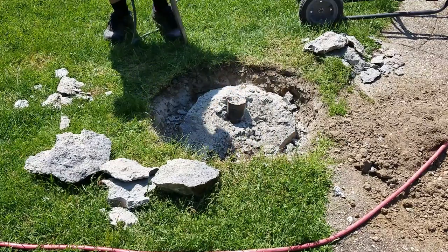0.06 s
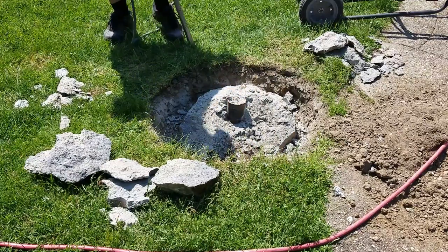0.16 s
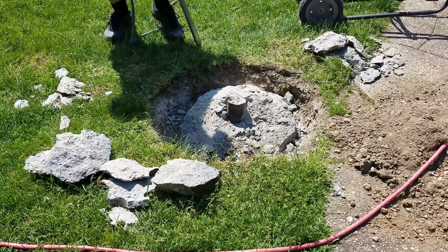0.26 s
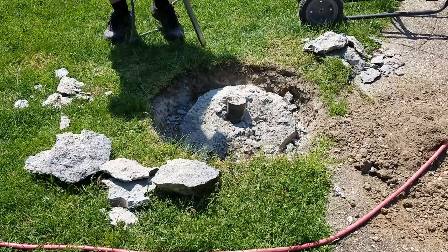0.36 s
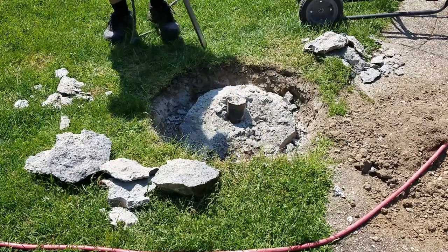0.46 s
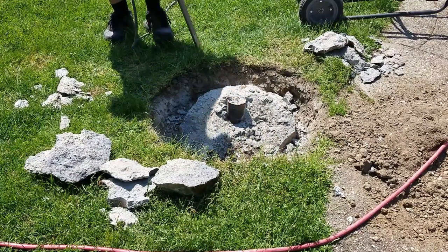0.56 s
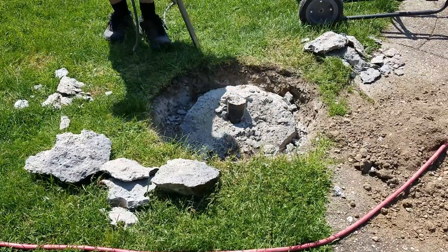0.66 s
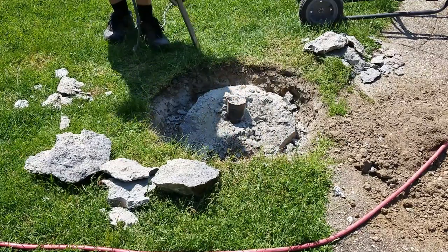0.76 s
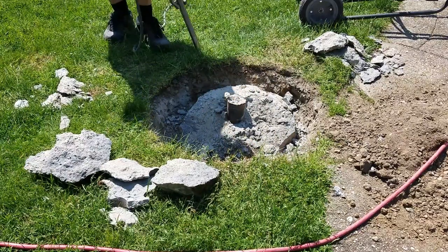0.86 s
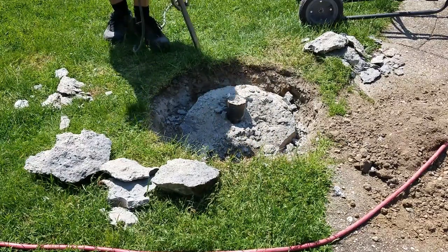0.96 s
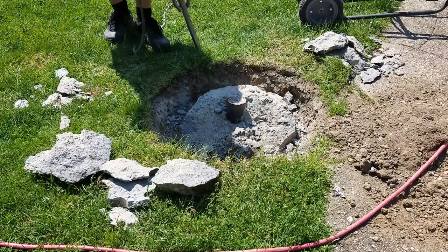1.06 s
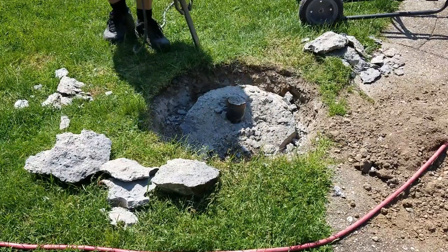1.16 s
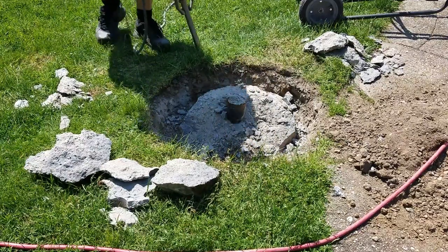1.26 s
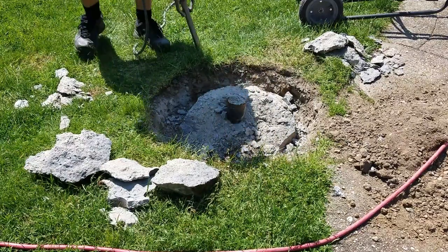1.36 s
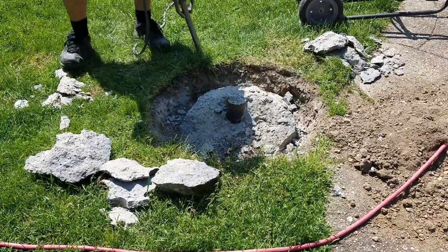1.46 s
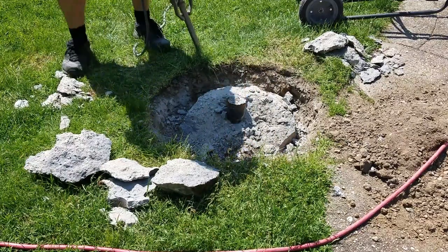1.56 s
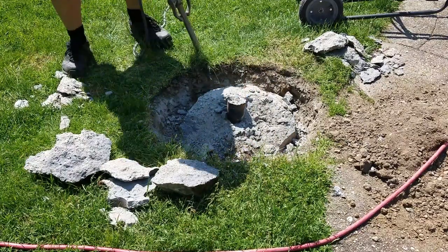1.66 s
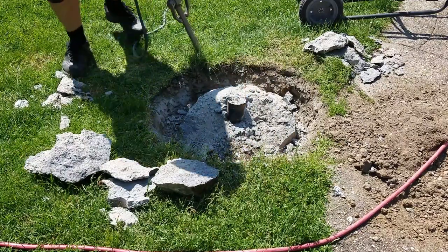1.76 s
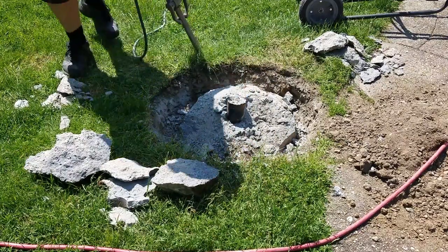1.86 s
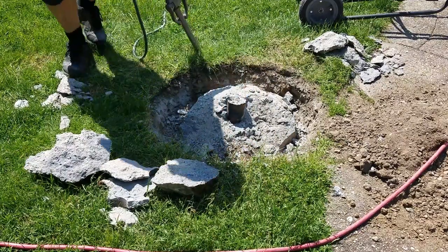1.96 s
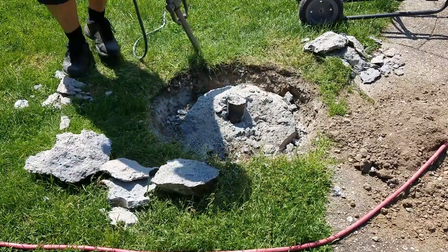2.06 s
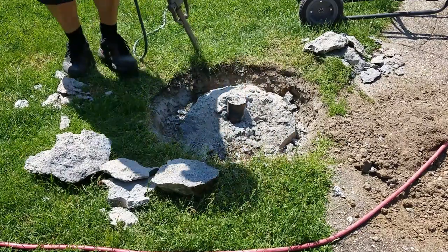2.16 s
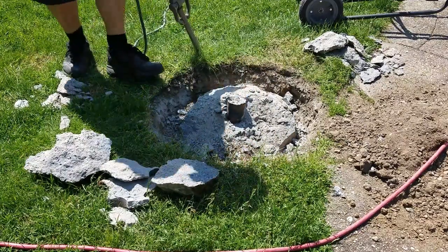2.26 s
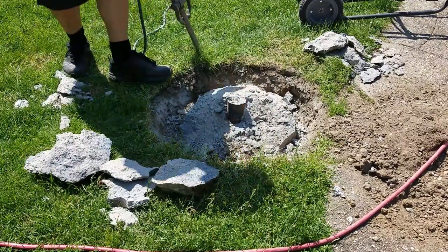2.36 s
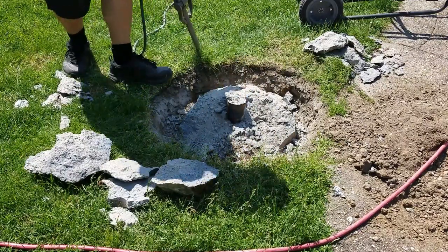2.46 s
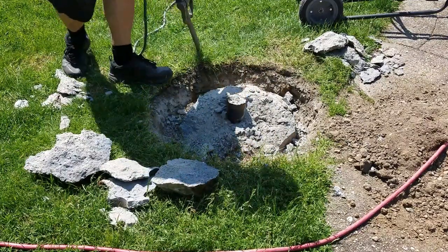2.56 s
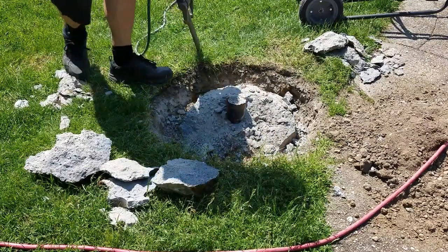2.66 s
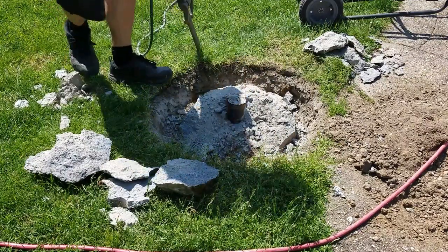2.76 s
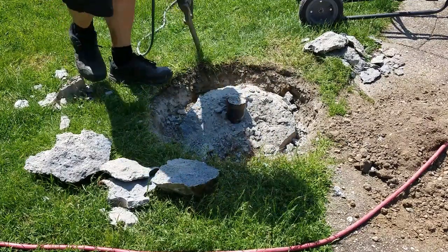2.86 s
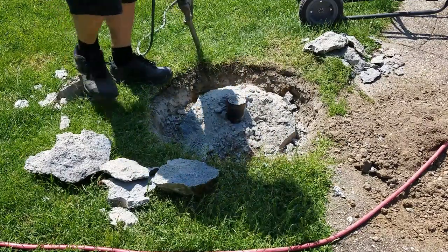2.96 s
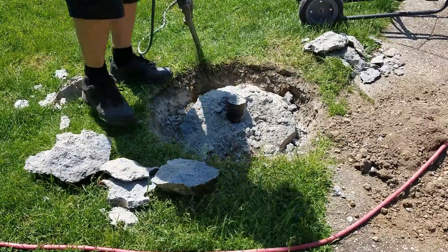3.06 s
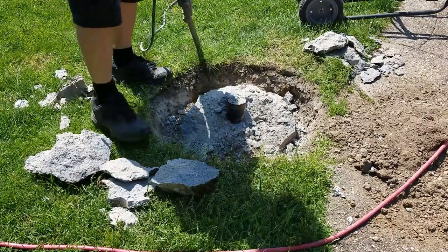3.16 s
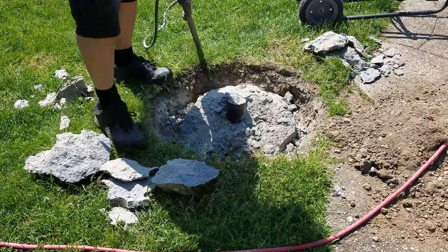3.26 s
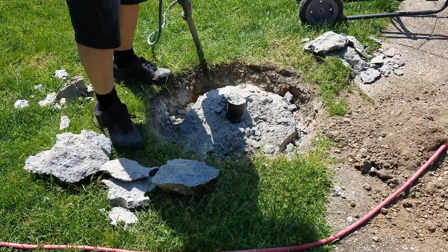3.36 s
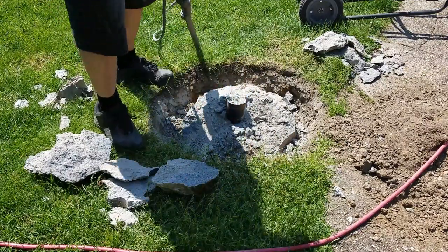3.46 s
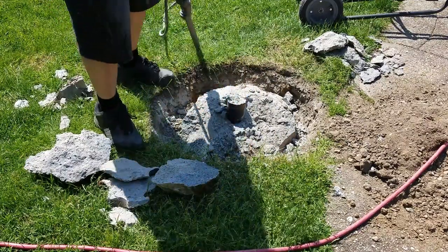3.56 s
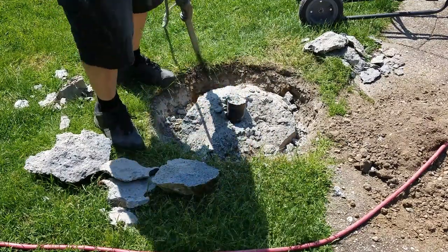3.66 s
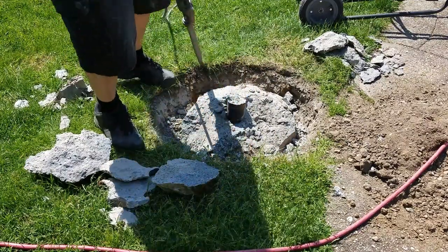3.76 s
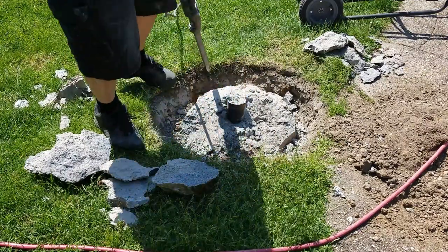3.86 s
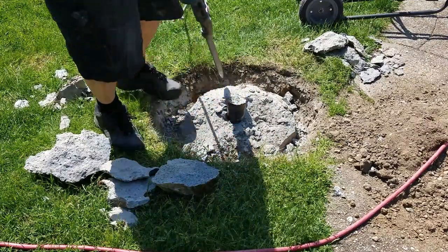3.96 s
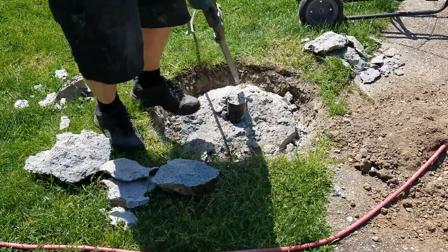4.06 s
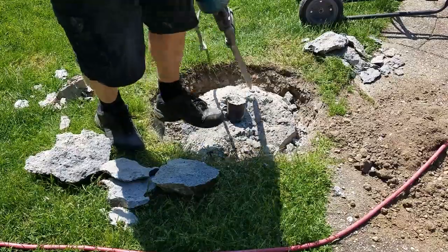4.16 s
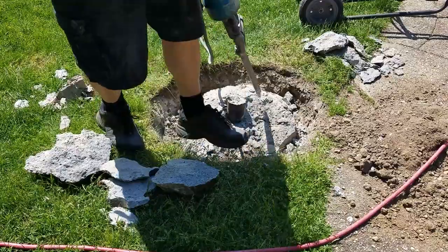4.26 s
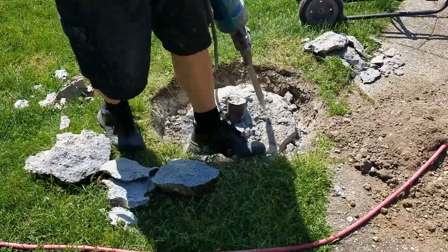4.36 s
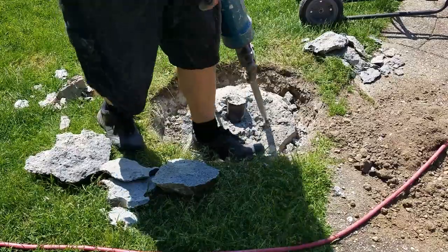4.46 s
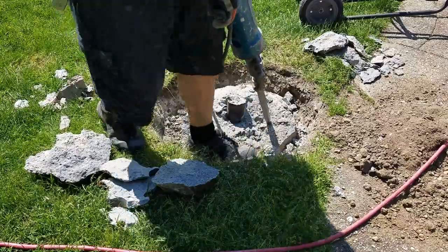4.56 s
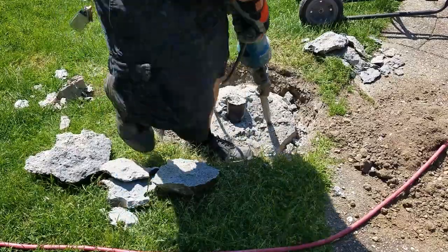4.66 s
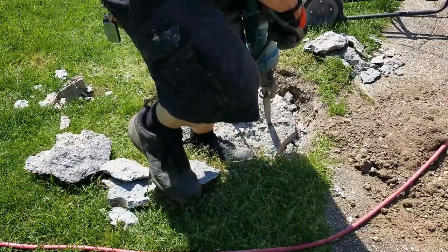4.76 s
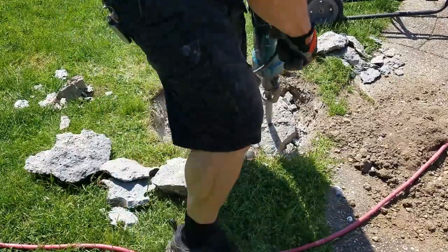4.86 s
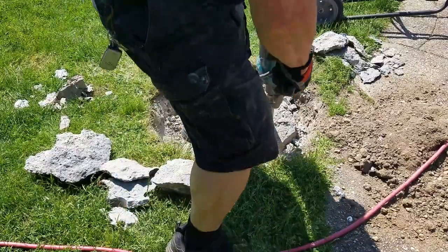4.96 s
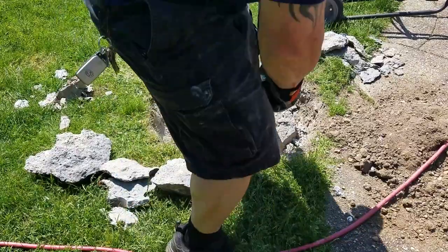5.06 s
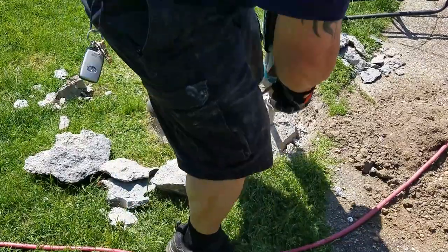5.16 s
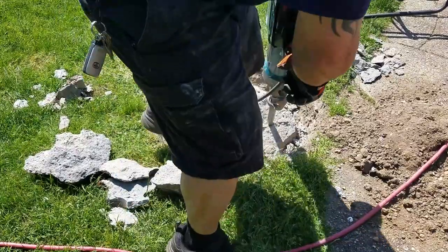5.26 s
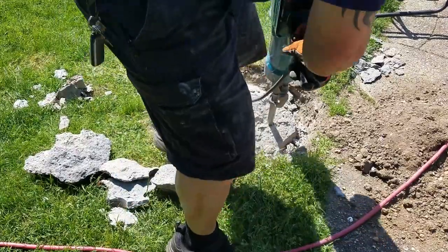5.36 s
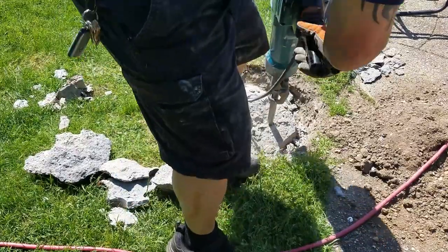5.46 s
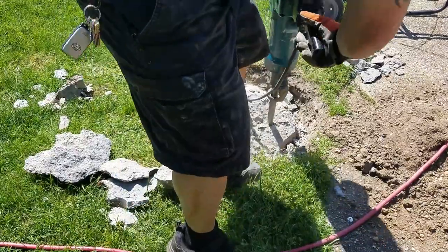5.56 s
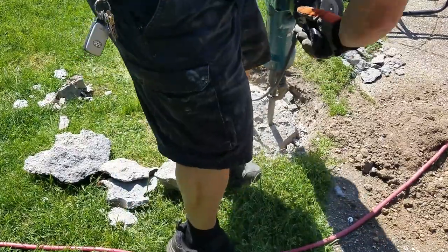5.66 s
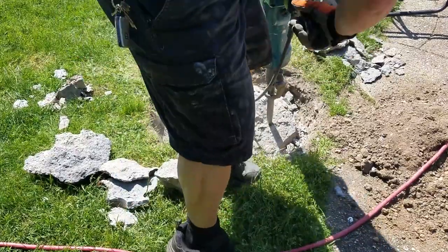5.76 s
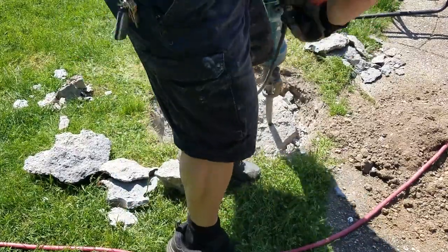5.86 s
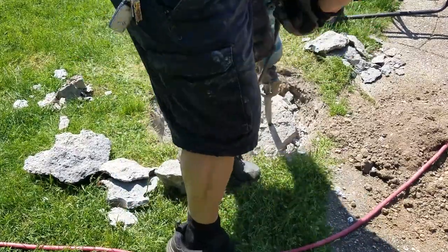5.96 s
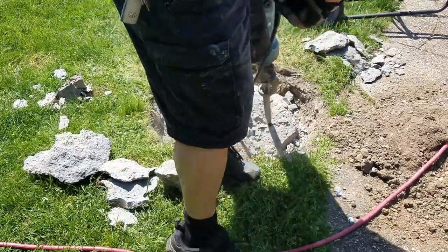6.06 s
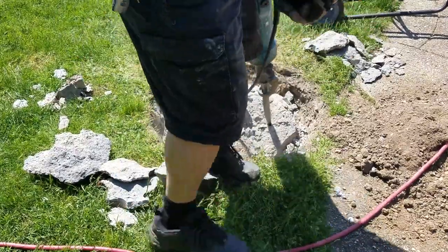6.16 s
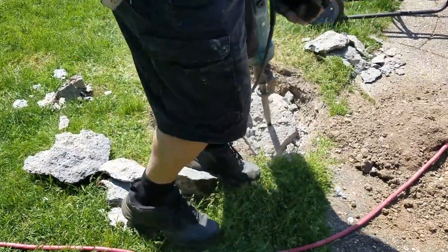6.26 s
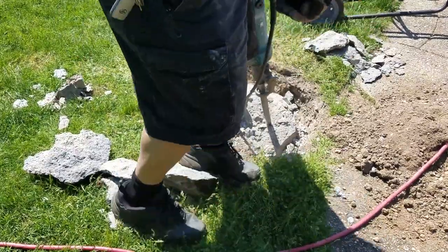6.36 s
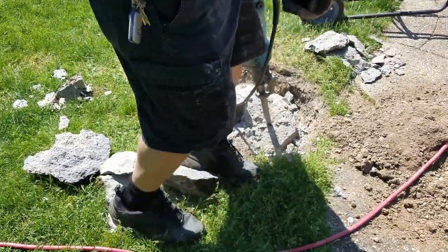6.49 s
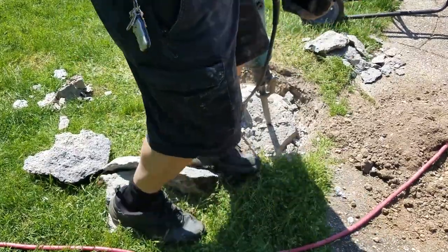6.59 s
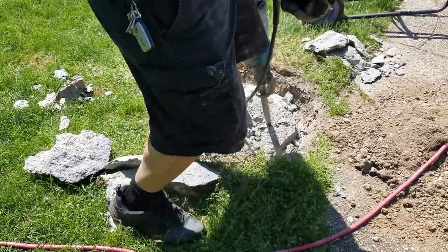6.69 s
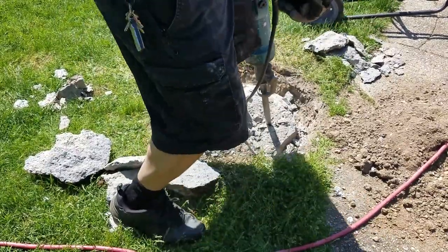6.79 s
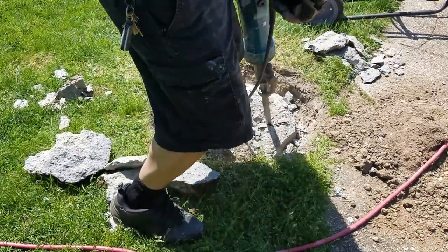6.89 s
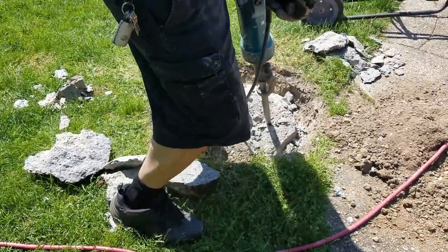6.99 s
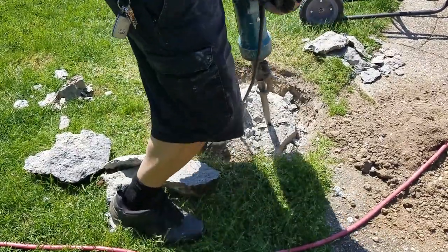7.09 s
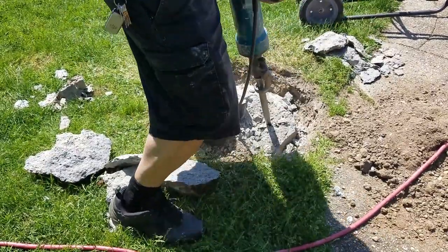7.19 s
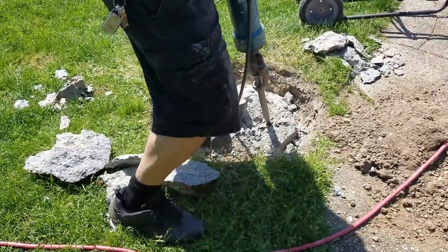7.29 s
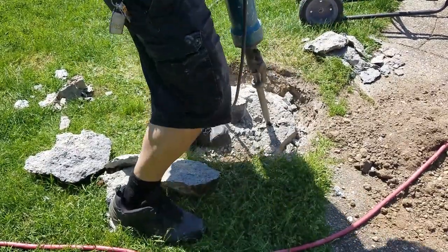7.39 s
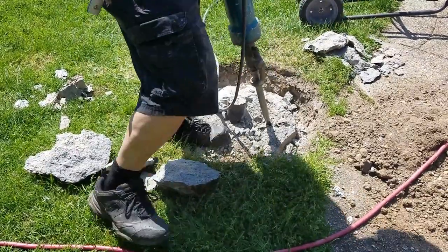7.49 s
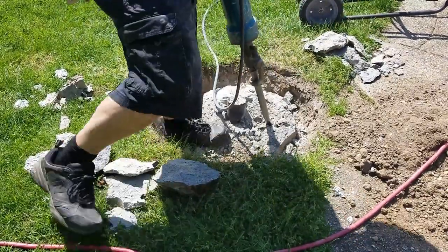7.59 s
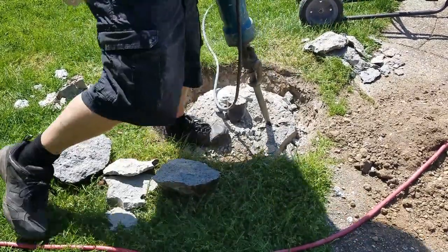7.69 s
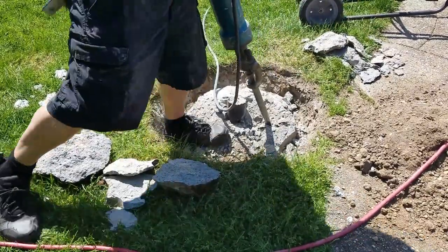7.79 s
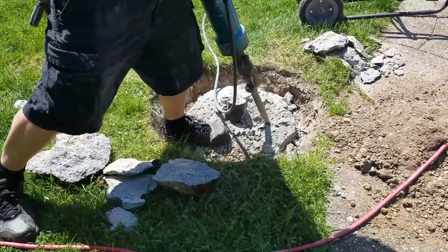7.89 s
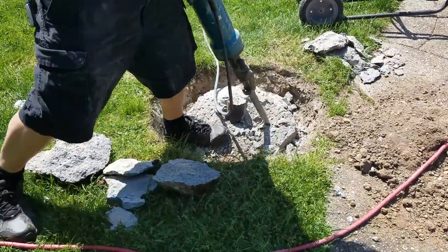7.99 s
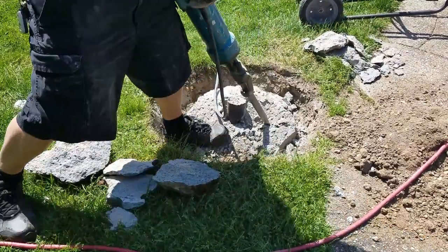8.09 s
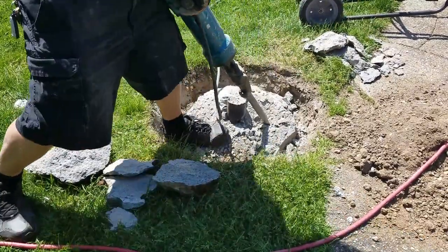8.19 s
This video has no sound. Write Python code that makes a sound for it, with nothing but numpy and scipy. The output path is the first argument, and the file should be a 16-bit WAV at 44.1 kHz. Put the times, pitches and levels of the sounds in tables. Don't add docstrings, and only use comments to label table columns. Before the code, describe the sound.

The falling whine and gritty roar of an electric demolition hammer fade as separate metallic strokes spread further apart. A low thud lands on turf, then small rubble ticks, a sharp steel set-down and dragging grit fill the pause over distant traffic. After a brief bird whistle the tool spins up suddenly and pounds concrete in a loud, dense, steady rattle to the end, heard nearby in stereo, with quick slap echoes outdoors.

```python
import sys
import numpy as np
from scipy import signal
from scipy.fft import rfft, irfft, next_fast_len
from scipy.io import wavfile
from scipy.ndimage import uniform_filter1d, map_coordinates

SR = 44100
rng = np.random.default_rng(int(sys.argv[2]) if len(sys.argv) > 2 else 0)


def wrap_up_sound(samples):
    columns = np.atleast_2d(samples).T
    tamed = np.clip(columns, -1, 1)
    steps = np.round(tamed * 32767).astype(np.int16)
    wavfile.write(sys.argv[1], SR, steps)


def convert_level_to_amplitude(level_db):
    exponent = np.asarray(level_db, float) / 20
    return 10 ** exponent


N = 362943


def unit(x):
    return x / np.sqrt(np.mean(x ** 2) + 1e-20)


def along(points, hz):
    f, v = np.transpose(points)
    return np.interp(np.log(hz + 1), np.log(f + 1), v)


def curves(rows):
    s, *cols = np.transpose(rows)
    return [np.interp(np.arange(N) / SR, s, c) for c in cols]


def within(rows):
    t = np.arange(N) / SR
    return uniform_filter1d(1. * (t >= rows[0][0]) * (t <= rows[-1][0]), size=132)


def wobble(rate):
    coarse = np.arange(0, N + 32, 32)
    knots = rng.standard_normal(int(N * rate / SR) + 4)
    return np.interp(np.arange(N), coarse, map_coordinates(knots, [coarse * rate / SR]))


def filtered(x, response):
    m = next_fast_len(x.shape[-1] + 4096)
    return irfft(rfft(x, m) * response(np.fft.rfftfreq(m, 1 / SR)), m)[..., :x.shape[-1]]


def humps(hz, peaks, base_db):
    return np.sqrt(convert_level_to_amplitude(base_db) ** 2 + sum(convert_level_to_amplitude(db) ** 2 / (1 + (2 * (hz - c) / w) ** 2) for c, w, db in peaks))


def rush(gain, lumps_db, rate):
    return unit(convert_level_to_amplitude(lumps_db * wobble(rate)) * filtered(rng.standard_normal((2, N)), gain))


def patchy(x, depth_db):
    z = signal.stft(x, nperseg=256)[2]
    field = uniform_filter1d(rng.standard_normal(z.shape[1:]), size=4, axis=0)
    field = uniform_filter1d(field, size=5, axis=1)
    return unit(signal.istft(z * convert_level_to_amplitude(depth_db * unit(field)), nperseg=256)[1][:, :N])


def ring(modes, t, scatter_db):
    hz, db, t60 = np.transpose(modes)[:, :, None]
    luck = rng.standard_normal((2, 2, len(hz), 1))
    decay = convert_level_to_amplitude(db + scatter_db * luck[0] - 60 * t / t60)
    return (decay * np.sin(2 * np.pi * hz * t + 2 * luck[1])).sum(1)


def add(track, s, x):
    at = track[:, round(s * SR):][:, :x.shape[-1]]
    at += x[..., :at.shape[1]]


def since_blow(times):
    t, times = np.arange(N) / SR, np.append(0, times)
    return t - times[np.searchsorted(times, t, side="right") - 1]


# start_s, share
LOAD = [(5.66, 0), (5.85, .3), (6.08, .96)]
# pitch_hz, level_db (per Hz)
RATTLE = [(1880, -4.5), (3200, 4.5), (6580, -0.5), (8610, -0.5), (9400, -7), (15200, -18), (16000, -50.5)]
# pitch_hz, level_db (per Hz)
JANGLE = [(2600, -15.5), (3600, -11), (7500, -6), (12500, 1), (15500, -5.5)]
JANGLE_FOLLOWS = 0.83, 0.37


def steel_rattle(times):
    hiss = rush(lambda f: convert_level_to_amplitude(along(RATTLE, f)), lumps_db=.5, rate=200)
    bands = [(hz, 1.5 * width, db - 3 * (hz < 7000) - 5 * (hz > 14500)) for hz, width, db in STEEL]
    jangle = rush(lambda f: convert_level_to_amplitude(along(JANGLE, f)) * humps(f, bands, base_db=-31), lumps_db=2.5, rate=150)
    jangle = patchy(jangle, depth_db=6)
    s, _, low_db, high_db, _ = np.transpose(FINDING + HOLDING)
    last = np.maximum(np.searchsorted(s, np.arange(N) / SR) - 1, 0)
    high = filtered(jangle, lambda f: np.clip(f / 2000 - 3.7, 0, 1))
    low_follows, high_follows = JANGLE_FOLLOWS
    low = convert_level_to_amplitude(low_follows * (low_db[last] + 35)) * (jangle - high)
    jangle = low + convert_level_to_amplitude(high_follows * (high_db[last] + 22.5)) * high
    dying = convert_level_to_amplitude(-0.5 - 128 * np.minimum(since_blow(times), .07))
    load = curves(LOAD)[0]
    return np.sqrt(1 - load) * hiss + np.sqrt(load) * jangle * dying


# start_s, mesh_db, fan_db
TONES = [(0, -1, -1), (.3, 1, 0), (.45, 0, -1), (.6, -4, -6), (.75, -4, -2), (.88, 8, 8), (5.5, -2, 0),
         (5.65, 0, -3), (5.74, 3, -3), (5.81, -2, 0), (5.89, 2, 2), (5.97, 2, 1), (6.05, -10, -8),
         (6.6, -11, -6), (6.8, -8, 2), (7.2, -8, 3), (7.45, -11, -3), (8.23, -8, -3)]
# start_s, share of its pitch
FAN_DRIFT = [(6.0, 1), (6.7, .962), (7.35, 1.015), (8.23, 1)]
COAST_HZ, SAG_HZ_PER_S = 1490, 520
FADE_S = 1.0
FULL_HZ, FULL_S, CLIMB_HZ_PER_S2 = 1747, 5.985, 4800


def gear_tones(times, db, up):
    t, load = np.arange(N) / SR, curves(LOAD)[0]
    coasting_hz = COAST_HZ - SAG_HZ_PER_S * t
    climbing_hz = FULL_HZ - CLIMB_HZ_PER_S2 * np.maximum(FULL_S - t, 0) ** 2
    mesh_hz = np.maximum(np.where(t < MOVE[1], coasting_hz, climbing_hz), 300)
    tone = (up + np.clip((FADE_S - t) * 10, 0, 1)) * convert_level_to_amplitude(db) * (mesh_hz / FULL_HZ) ** 2.6
    mesh_db, fan_db = curves(TONES)

    def angle(hz, unsteady):
        jitter = (.006 + unsteady * load ** 3) * wobble(60)
        return 2 * np.pi * np.cumsum(hz * (1 + jitter)) / SR

    stroke_db = 6 * up * np.cos(2 * np.pi * (since_blow(times) - .052) / .064)
    mesh = convert_level_to_amplitude(mesh_db + 4 * wobble(35) + stroke_db) * np.sin(angle(mesh_hz, .01))
    fan_hz = 1.87 * mesh_hz * curves(FAN_DRIFT)[0]
    fan = convert_level_to_amplitude(fan_db - 7.5 + 4 * wobble(25)) * np.sin(angle(fan_hz, .018))
    return tone * (mesh + fan)


# start_s, level_db
MOTOR = [
    [(0, -21), (.82, -26), (1.0, -36.5), (1.1, -43), (1.7, -45), (2.15, -37.5), (2.65, -40.5), (3.3, -49.5),
     (3.8, -55), (4.2, -60.5)],
    [(5.506, -25.5), (5.6, -24), (5.67, -19), (5.83, -21.5), (5.98, -26), (6.33, -29.5), (7.11, -32),
     (7.6, -30), (8.23, -32.5)],
]
# pitch_hz, level_db (per Hz)
ROAR = [(120, -34.5), (200, -16), (512, -7.5), (608, -3), (695, -1), (1300, -4.5), (1690, -59),
        (2860, -120)]
# pitch_hz, level_db (per Hz)
RASP = [(530, -36), (900, -6), (1080, -1.5), (1680, 0), (3960, -12), (4200, -18), (5460, -15.5),
        (9240, -120)]
# pitch_hz, width_hz, level_db
CASING = [(390, 43, 4.5), (515.5, 28, 5.5), (705, 120, -3.5), (925, 14, 0), (1540, 280, -4),
          (1580, 37, -6.5), (2052, 11, 0), (2780, 570, -7.5)]
# start_s, level_db
SHAKE = [(0, -39), (.9, -36), (1.2, -46.5), (1.5, -66), (2.3, -56.5), (4.2, -62.5)]
ROAR_DB, ROAR_LOADED_DB, IDLE_DB = -6, 3.5, -48.5
RATTLE_DB, RATTLE_LOADED_DB = -10.5, 20
SURGE_DB, SURGE_S = 3.5, 0.12
CLATTER_DB, CLATTER_S = 3, 0.079
SHAKE_HZ = 137
WHINE_HZ, WHINE_DB = 1600, -7.5


def motor(times):
    roar = rush(lambda f: convert_level_to_amplitude(along(ROAR, f)) * humps(f, CASING, base_db=-11), lumps_db=2, rate=70)
    rasp = rush(lambda f: convert_level_to_amplitude(along(RASP, f)) * humps(f, CASING, base_db=-10), lumps_db=2, rate=120)
    rasp = patchy(rasp, depth_db=3.5)
    t, load = np.arange(N) / SR, curves(LOAD)[0]
    down, up = (within(rows) for rows in MOTOR)
    db = curves(MOTOR[0] + MOTOR[1])[0]
    surge_db = up * SURGE_DB * np.exp(-np.abs(t - MOTOR[1][0][0]) / SURGE_S)
    casing = np.hypot(convert_level_to_amplitude(db + ROAR_DB + ROAR_LOADED_DB * load + surge_db), down * convert_level_to_amplitude(IDLE_DB))
    rattle = convert_level_to_amplitude(db + RATTLE_DB + load * RATTLE_LOADED_DB - 2.1 * surge_db) * steel_rattle(times)

    after = since_blow(times) / CLATTER_S
    clatter_db = CLATTER_DB * (after * np.exp(1 - after) - .5) + 1.2 * wobble(30)
    clumps = convert_level_to_amplitude(clatter_db * down * (t > FADE_S))
    out = (down + up) * (clumps * (casing * roar + convert_level_to_amplitude(db - 1.04) * rasp) + rattle)

    shake = rush(lambda f: f / SHAKE_HZ / (1 + (f / SHAKE_HZ) ** 4), lumps_db=3.5, rate=7.4)
    out += down * convert_level_to_amplitude(curves(SHAKE)[0]) * shake
    whine = rush(lambda f: 1 / (1 + ((f - WHINE_HZ) / 60) ** 2), lumps_db=3, rate=10)
    singing = np.clip(t - 2, 0, 1) * np.clip((3.9 - t) * 8, 0, 1)
    out += down * singing * convert_level_to_amplitude(db + WHINE_DB + 5 * np.clip(t - 2.5, 0, 1)) * whine
    out[0] += gear_tones(times, db, up)
    return out


# start_s, level_db
TRAFFIC = [(0, -33.5), (.78, -37.5), (1.26, -50), (1.65, -53.5), (3.07, -44.5), (4.6, -44), (6.07, -48),
           (6.49, -75), (8.23, -77)]
# pitch_hz, level_db (per Hz)
RUMBLE = [(15, -51.5), (25, -28.5), (75, 1.5), (168, -14.5), (361, -1), (452, -3.5), (487, -22.5),
          (687, -10.5), (900, -52.5), (1170, -70), (1980, -120)]
# start_s, length_s, from_hz, to_hz, level_db
BIRD = [(3.06, .05, 4200, 4400, -60), (5.045, .05, 3500, 4400, -58), (5.19, .08, 3900, 4200, -56),
        (5.31, .05, 4600, 3600, -53), (5.35, .03, 2600, 2750, -57), (5.385, .03, 8000, 6400, -60),
        (5.45, .047, 4500, 3900, -51)]
# start_s, level_db
KEYS = [(5.165, -53), (5.206, -52), (5.329, -53)]
# pitch_hz, level_db, t60_s
KEY_RING = [(9600, -4, .12), (10800, -3, .2), (12100, 0, .08)]


def yard():
    out = convert_level_to_amplitude(curves(TRAFFIC)[0] + 1.5) * rush(lambda f: convert_level_to_amplitude(along(RUMBLE, f)), lumps_db=1.1, rate=9)
    out += convert_level_to_amplitude(-67.5) * rng.standard_normal((2, N))
    for s, length, from_hz, to_hz, db in BIRD:
        u = np.arange(round(length * SR)) / (length * SR)
        arch = 250 * (1 - np.cos(np.pi * u)) / np.pi
        turns = 2 * np.pi * length * (from_hz * u + (to_hz - from_hz) * u ** 2 / 2 + arch)
        voices = np.sin(turns) + .6 * np.sin(.87 * turns)
        add(out, s, convert_level_to_amplitude(db) * np.sin(np.pi * u) * voices * (1 + .5 * np.sin(turns / 40)))
    for s, db in KEYS:
        add(out, s, convert_level_to_amplitude(db) * ring(KEY_RING, np.arange(SR // 5) / SR, scatter_db=2))
    return out


# start_s, peak_db, steel_ring_db, slab_ring_db
COASTING = [(0.4901, -11, -2, 4), (0.5382, -15, -2.5, -14), (0.7813, -12, -2, -17.5), (0.908, 0, 6, -12),
            (1.0075, -10, 3.5, -37.5), (1.1349, -10, 6, -28), (1.262, -9.5, 1, -10),
            (1.4113, -8, -1.5, -15), (1.5784, -13, -9, -11), (1.767, -14, -13, -16),
            (1.9858, -13, -23, -1.5), (2.2271, -3.5, -27, -6), (2.5075, -12, -6.5, 0.5),
            (2.8597, -15.5, -3, -7), (3.1606, -15, -57, -5), (3.198, -11.5, -53, -11)]
# start_s, peak_db, low_steel_db, high_steel_db, slab_ring_db
FINDING = [(5.6765, -1.5, -25, -18, -7), (5.7571, -2.5, -27, -20, -5), (5.8269, 0.5, -40, -20, -2.5),
           (5.8919, -1.5, -31, -18, -6.5), (5.9556, -3, -39, -20, -4), (6.0158, -5.5, -32, -22, -10),
           (6.0746, -7, -27.5, -25, -6.5), (6.1331, -6, -24, -24, -7), (6.191, -5.5, -20.5, -15, -3.5),
           (6.2516, -3.5, -30, -21, -16), (6.3101, -3, -24.5, -17, -6), (6.3744, -6.5, -28, -20, -27),
           (6.4344, -5, -23, -18, -11), (6.4957, -2.5, -27.5, -25, -9.5), (6.559, -7, -25.5, -23, -19),
           (6.6202, -6.5, -31, -20, -13)]
# start_s, peak_db, low_steel_db, high_steel_db, slab_ring_db
HOLDING = [(6.6831, -15, -28, -16, -12.5), (6.7463, -11.5, -30.5, -14, -17), (6.8075, -12, -36, -32, -4),
           (6.8703, -11, -33.5, -38, -2), (6.9316, -11.5, -29.5, -23, -1), (6.9934, -10, -30, -32.5, -4),
           (7.0549, -8, -33, -33.5, -8.5), (7.1163, -9, -29, -31, -5), (7.1764, -8.5, -36, -36, -14),
           (7.2371, -11, -28, -19.5, -8.5), (7.2987, -5, -28.5, -17.5, -5.5), (7.3598, 0.5, -27, -22, -3.5),
           (7.4214, -1.5, -29, -21.5, -2), (7.4842, -3.5, -21.5, -21, -4), (7.5441, 0, -18.5, -14, -6),
           (7.6082, -2, -26.5, -23, -5), (7.671, -4, -22, -16, -1.5), (7.7336, -0.5, -30, -16, -5),
           (7.7945, -0.5, -28.5, -21, -10), (7.8581, -3.5, -28.5, -30, -9.5), (7.9174, 0, -32, -16, -12),
           (7.981, -0.5, -29, -20.5, -13), (8.0435, -2.5, -28.5, -23.5, -11), (8.1049, -2, -38, -20, -17),
           (8.1679, -2, -42, -22, -15)]
# start_s, pitch_hz
SLAB_PITCH = [(5.67, 806), (5.83, 714), (6.3, 705), (6.4, 840), (6.62, 794), (6.7, 705), (7.2, 710),
              (7.36, 788), (7.73, 750), (7.9, 813), (8.17, 838)]
HIGH_RING_DB, DULLS_DB_PER_S = 0, 6
IDLE_SLAB_HZ, LUCK_HZ = 750, 20


def strikes():
    s, db, low_db, slab_db = np.transpose(COASTING)
    high_db = low_db + HIGH_RING_DB - DULLS_DB_PER_S * s
    slab_hz = IDLE_SLAB_HZ + LUCK_HZ * rng.standard_normal(len(s))
    idle = np.column_stack([s, db, low_db, high_db, slab_db, slab_hz])
    s, db, *rings_db = np.transpose(FINDING + HOLDING)
    slab_hz = np.interp(s, *np.transpose(SLAB_PITCH)) + LUCK_HZ * rng.standard_normal(len(s))
    return np.vstack([idle, np.column_stack([s, db, *(rings_db - db), slab_hz])])


# pitch_hz, width_hz, level_db
STEEL = [(2040, 50, -8), (2845, 50, -6), (4360, 56, -9), (4550, 41, -12), (5290, 35, -11), (6520, 47, -8),
         (8370, 64, -18), (8800, 51, -16), (10300, 40, -8), (10700, 110, -14), (11300, 44, -11),
         (13200, 65, -19), (13800, 38, -11), (15000, 39, 0)]
# pitch_hz, width_hz, level_db
LOOSE = [(2750, 110, -7), (4500, 70, -6), (5280, 50, -3), (6240, 60, -7), (6500, 60, -3), (8380, 90, -8),
         (8860, 45, -8), (10300, 50, -11), (10700, 80, -15), (11300, 45, -15), (13200, 160, -21),
         (15000, 60, -18)]
# ratio to the slab pitch, level_db, t60_s
SLAB = [(.54, -7, 0.036), (1.001, -2.5, 0.09), (1.13, -4, .06)]
# pitch_hz, level_db, t60_s
BARREL = [(1399, -11, .05), (2177, -28.5, 0.035)]
# pitch_hz, level_db
CRACK = [(300, -11), (900, 0.5), (1600, 0), (2800, -2), (5000, -6.5), (9000, -10.5), (16000, -14.5)]


def blow(pressed, low_db, high_db, slab_db, slab_hz, thump_db):
    t = np.arange(SR // 7) / SR
    body, low_ring_db, high_ring_db = (STEEL, 6, -1.5) if pressed else (LOOSE, -4, -1)
    ring_s_hz = 2.5 if pressed else 1.8
    rings_db = [low_db + low_ring_db, high_db + high_ring_db]
    steel = [(hz, level + np.interp(hz, [6500, 10000], rings_db), ring_s_hz / width) for hz, width, level in body]
    slab = [(ratio * slab_hz, level, t60) for ratio, level, t60 in SLAB]
    wide = [(hz, 4 * width, level + 13) for hz, width, level in body]

    def tilt(f):
        lean_db = np.interp(f, [3500, 4960, 7200, 10100], [0, low_db + 21.0, low_db + 25.5, high_db + 2])
        return convert_level_to_amplitude(along(CRACK, f) + 0.24 * lean_db)

    def bands(f):
        return tilt(f) * humps(f, wide, base_db=-9)

    crack = 2.2 * filtered(rng.standard_normal((2, len(t))), tilt) * convert_level_to_amplitude(-60 * t / .019)
    chatter = .3 * filtered(rng.standard_normal((2, len(t))), bands) * convert_level_to_amplitude(-60 * t / .09)
    thump = np.sin(2 * np.pi * 150 * t) + 1.27 * np.sin(2 * np.pi * 250 * t)
    thump = convert_level_to_amplitude(thump_db) * thump * convert_level_to_amplitude(-60 * t / 0.025) * [[1], [0]]
    hit = crack + chatter + ring(steel, t, scatter_db=4 if pressed else 3.5) + thump
    hit = hit * np.minimum(t / 0.0016, 1)
    swell = convert_level_to_amplitude(slab_db - 3.5) * ring(slab, t, scatter_db=2.0) * (1 - np.exp(-t / 0.0076))
    swell = swell + (not pressed) * ring(BARREL, t, scatter_db=-1.5)
    return crack, hit + swell


# start_s, level_db
RETURNS = [(5.711, -24), (5.793, -17), (5.862, -19), (5.928, -21), (7.2118, -13.5)]
# start_s, level_db
SET_DOWN = [(4.369, -10), (4.379, -28), (4.523, -20)]
# start_s, level_db, pitch_hz
THUD = (.908, -9, 120)
REBOUND_DB, REBOUND_FADES_DB_PER_S, PRESSED_REBOUND_DB = -4.5, 5, -17.5


def blows(piston):
    out, t = np.zeros((2, N)), np.arange(SR // 7) / SR
    for s, db, low_db, high_db, slab_db, slab_hz in piston:
        pressed = s > MOVE[1]
        thump_db = -26.5 - db if pressed else -26
        crack, whole = blow(pressed, low_db, high_db, slab_db, slab_hz, thump_db)
        add(out, s, convert_level_to_amplitude(db) * whole)
        rebound_db = PRESSED_REBOUND_DB if pressed else REBOUND_DB - REBOUND_FADES_DB_PER_S * s
        add(out, s + .0125, convert_level_to_amplitude(db + rebound_db) * crack[::-1])
    for taps, body in ((RETURNS, STEEL[5:]), (SET_DOWN, LOOSE[:3])):
        modes = [(hz, level, 2.05 / width) for hz, width, level in body]
        for s, db in taps:
            tick = .08 * rng.standard_normal((2, len(t))) * convert_level_to_amplitude(-60 * t / 0.0091)
            add(out, s, convert_level_to_amplitude(db) * (tick + ring(modes, t, scatter_db=4.5)))
    out = filtered(out, lambda f: (1j * f / (75 + 1j * f)) ** 3)
    s, db, hz = THUD
    add(out, s, convert_level_to_amplitude(db - 60 * t / 0.027) * np.sin(2 * np.pi * hz * t) * [[1], [.3]])
    return out


# delay_s, level_db, smear_t60_s
WALLS = [
    (.008, -13.5, 0.16),
    (.036, -11, 0.074),
    (.073, -16.5, .04),
]


def walls(x):
    reply, t = np.zeros((2, SR // 5)), np.arange(SR // 10) / SR
    for s, db, t60 in WALLS:
        smear = rng.standard_normal((2, len(t))) * convert_level_to_amplitude(-60 * t / t60)
        add(reply, s, convert_level_to_amplitude(db) * smear / np.linalg.norm(smear[0]))
    echoes = signal.fftconvolve(x, reply, axes=1)[:, :N]
    return filtered(echoes, lambda f: 1 / (1 + (f / 12000) ** 2))


# start_s, peak_db, knock_db, knock_hz
KNOCKS = [(2.021, -23.5, -9.5, 390), (2.8954, -37, 9, 705), (3.234, -33.5, -15, 393),
          (3.273, -31, -20, 557), (3.3982, -26.5, -9, 385), (3.8193, -30.5, -18, 900),
          (3.848, -36, -11, 412), (4.234, -53, 21.5, 430), (4.3668, -9.5, -3.5, 960),
          (4.3791, -10, -6, 685), (4.4125, -27, -12, 732), (4.5225, -7, -6.5, 930), (4.537, -16, 1, 395),
          (4.583, -36, 8, 396), (4.7227, -27, 7, 750), (4.801, -20.5, 2, 780), (4.8795, -32, -16, 385),
          (4.984, -36, -3, 367), (5.372, -32, -10, 438), (5.5063, -20, -20, 506)]
# start_s, level_db
SPITS = [(2.8954, -47), (4.334, -61), (4.665, -51), (4.765, -39), (4.8794, -37), (5.007, -34.5),
         (5.163, -54), (5.2784, -53), (5.504, -33)]
# start_s, rise_s, pitch_hz, level_db
HOLLOW = [(4.46, 0.0092, 851, -26.5), (4.708, 0.0065, 737, -34), (4.7245, 0.0013, 1170, -18),
          (4.7465, 0.0015, 496, -14), (4.757, 0.0032, 427, -20.5), (4.768, 0.0024, 1140, -31),
          (4.778, 0.012, 760, -22.5)]
# start_s, level_db
SCRAPE = [(4.2, -53), (4.26, -41), (4.34, -37.5), (4.406, -36.5), (4.47, -35), (4.67, -42.5), (5.03, -51.5),
          (5.29, -50.5), (5.5, -51.5)]
# low_hz, high_hz, level_db (at full force), growth (dB per dB)
DRAG = [
    (304, 1200, -33, 1.25),
    (1100, 3100, -36.5, 1.5),
    (4000, 8700, -41.5, 1.7),
]
HISS_DB = -32


def rubble():
    out, t = np.zeros((2, N)), np.arange(SR // 10) / SR

    def spiky(t60):
        force = convert_level_to_amplitude(8.06 * rng.standard_normal(len(t)) - 60 * t / t60)
        return rng.standard_normal((2, len(t))) * force * np.minimum(t / 0.0026, 1)

    def fine():
        return 1.33 * filtered(spiky(0.083), lambda f: np.clip(f / 9000, 0, 1) ** 2)

    for s, db, knock_db, hz in KNOCKS:
        grit = 1.3 * filtered(spiky(0.056), lambda f: convert_level_to_amplitude(along(CRACK, f) - f / 500))
        knock = filtered(spiky(36 / hz), lambda f: 1j * f * 90 / (hz * hz - f * f + 1j * f * 90))
        add(out, s, convert_level_to_amplitude(db) * (grit + convert_level_to_amplitude(HISS_DB) * fine() + convert_level_to_amplitude(knock_db + 15.5) * knock))
    for s, db in SPITS:
        add(out, s, convert_level_to_amplitude(db) * fine())
    for s, rise, hz, db in HOLLOW:
        u = np.arange(SR // 7) / SR / rise
        wander = 0.12 * np.cumsum(rng.standard_normal(len(u)))
        rock = u * np.exp(1 - u) * np.sin(2 * np.pi * hz * rise * u + wander)
        add(out, s, convert_level_to_amplitude(db) * rock * [[1], [.2]])
    force_db = curves(SCRAPE)[0] + 34
    for low_hz, high_hz, db, grows in DRAG:
        band = lambda f: 1 / (1 + (low_hz / (f + 1)) ** 3) / (1 + (f / high_hz) ** 3)
        out += within(SCRAPE) * convert_level_to_amplitude(db + grows * force_db) * rush(band, lumps_db=4.0, rate=47)
    return out


# pitch_hz, likeness
ALIKE = [(30, .3), (80, .75), (160, .55), (350, .92), (700, .93), (1400, .85), (2800, .74), (8000, .62)]


def paired(x):
    turn = lambda hz: np.arccos(np.clip(along(ALIKE, hz), -1, 1)) / 2
    mid, side = filtered(x, lambda hz: np.array([np.cos(turn(hz)), np.sin(turn(hz))]))
    return np.array([mid + side, mid - side])


def scene():
    piston = strikes()
    hits = blows(piston) + rubble()
    return paired(hits + walls(hits) + motor(piston[:, 0]) + yard())


# pitch_hz, level_db
SIDES = [(60, 0), (110, -3.5), (200, 0.5), (380, -0.5), (700, 0.0), (1290, 0.5), (2380, 0.5), (4400, 1.0),
         (8120, -0.5), (15000, -6.5)]


def ports(x, lead):
    def port(f, side):
        return convert_level_to_amplitude(side * along(SIDES, f) / 2) * np.exp(1j * np.pi * f * lead * side)
    return filtered(x, lambda f: np.array([port(f, 1), port(f, -1)]))


def low_pass(x):
    return signal.sosfilt(signal.butter(12, 16830, fs=SR, output="sos"), x)


# start_s, end_s
MOVE = (4.1, 4.3)
# before_s, after_s the tool moves
LEAD = (62e-6, -45e-6)
# start_s, end_s, level_db
GAP = (6.632, 6.683, -20)
# pitch_hz, level_db
TOP = [(15700, 0), (15950, -21), (16700, -24), (16900, -70)]


def record(dry):
    moved = curves([(MOVE[0], 0), (MOVE[1], 1)])[0]
    x = (1 - moved) * ports(dry, LEAD[0]) + moved * ports(dry, LEAD[1])
    start, end, db = GAP
    x = x * convert_level_to_amplitude(curves([(start - .002, 0), (start, db), (end - .004, db - 4), (end, 0)])[0])
    rounded = x / (1 + np.abs(x / 0.6) ** 6) ** (1 / 6)
    mix = filtered(rounded, lambda f: convert_level_to_amplitude(along(TOP, f)))
    return low_pass(mix)


dry = scene()
out = record(dry)
wrap_up_sound(out)
```